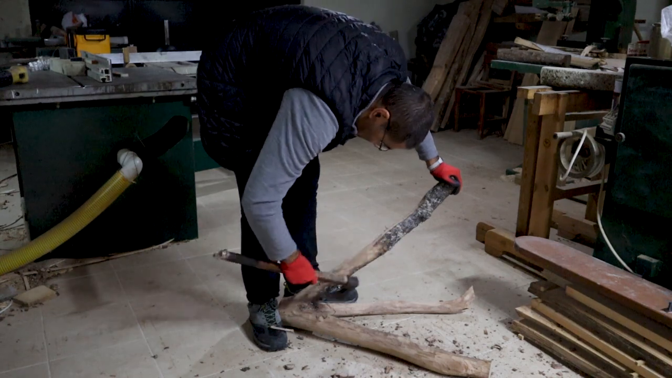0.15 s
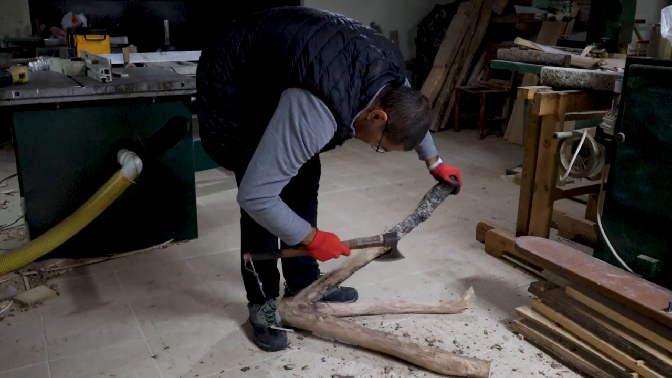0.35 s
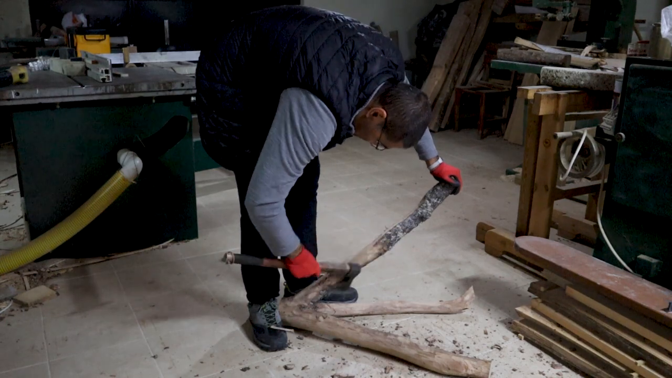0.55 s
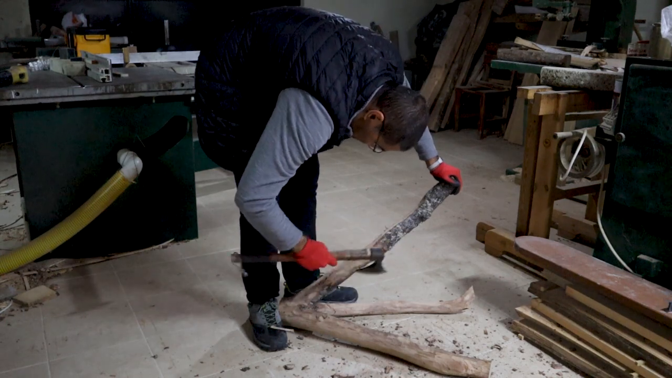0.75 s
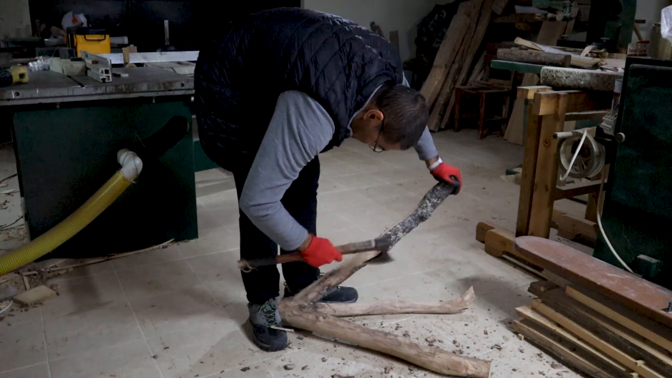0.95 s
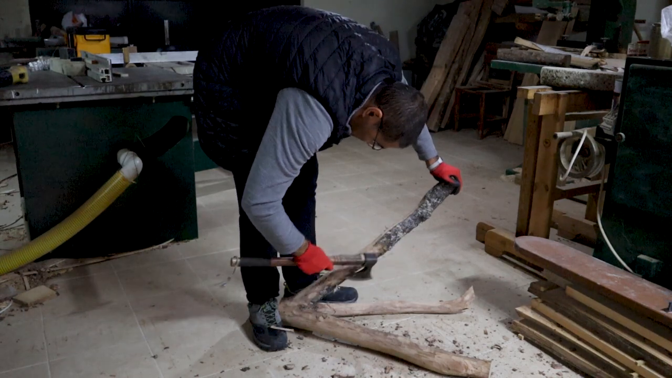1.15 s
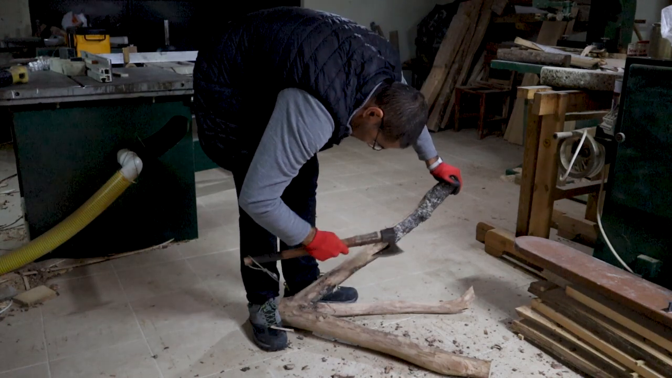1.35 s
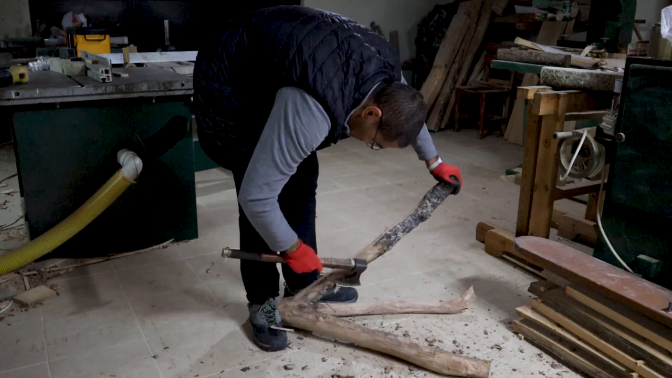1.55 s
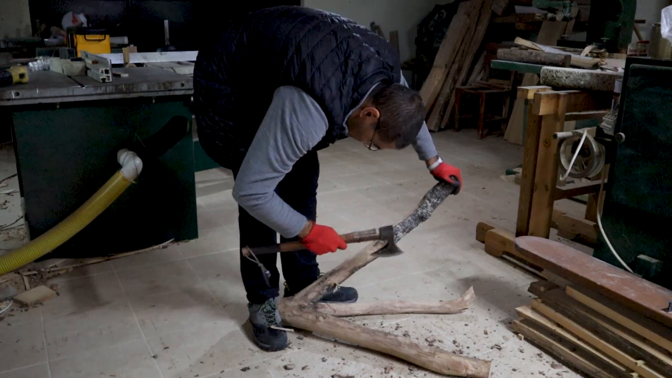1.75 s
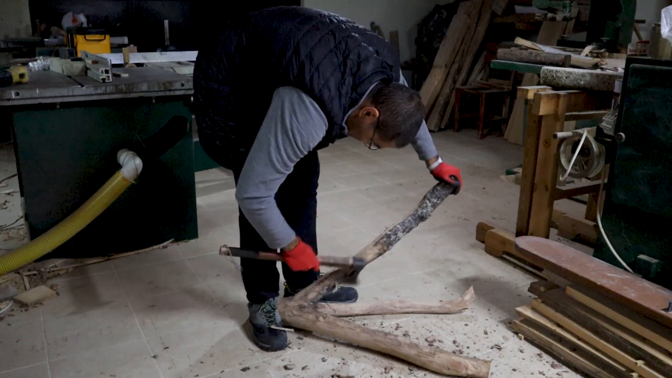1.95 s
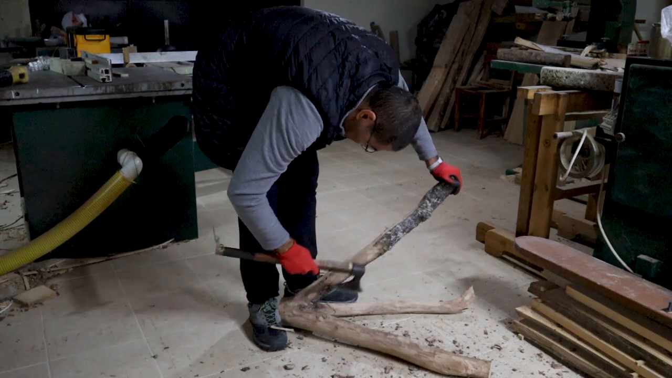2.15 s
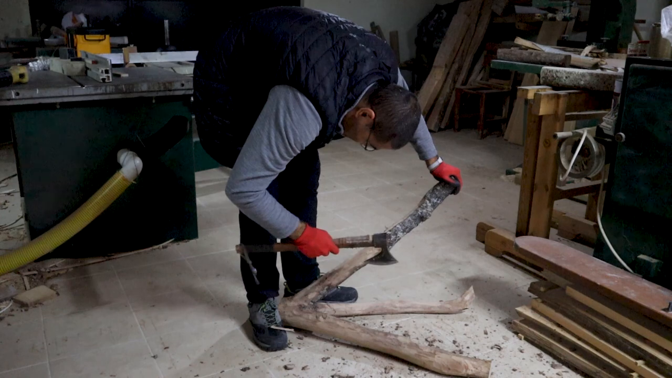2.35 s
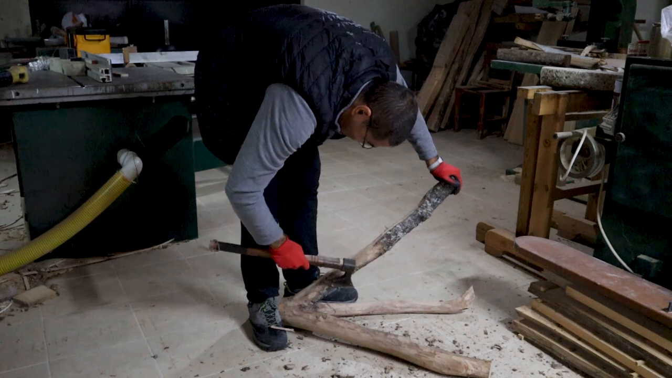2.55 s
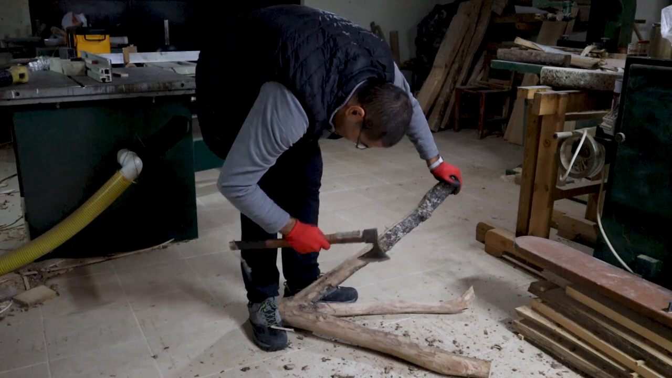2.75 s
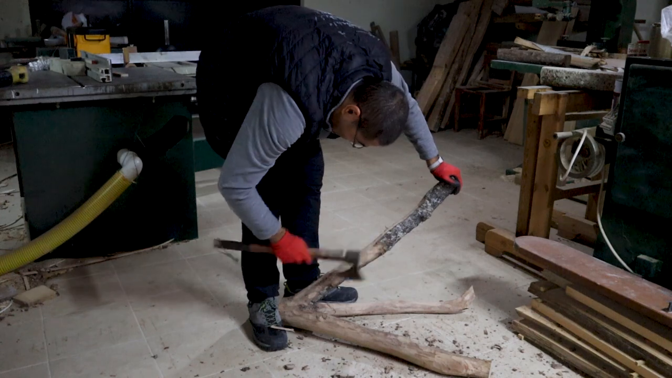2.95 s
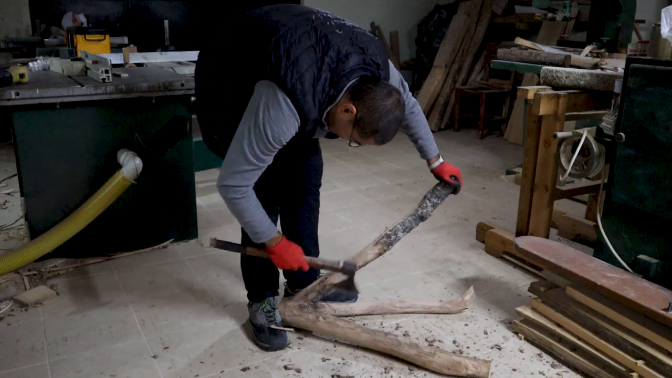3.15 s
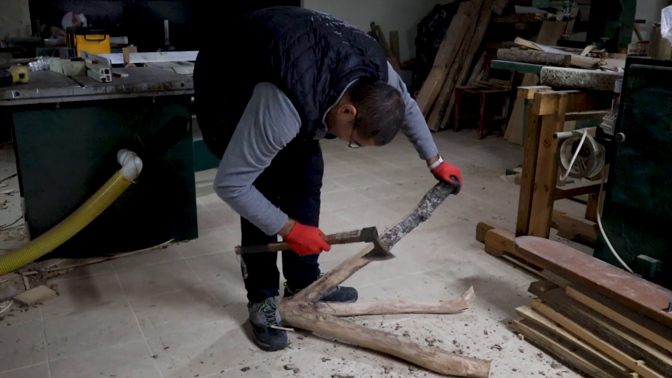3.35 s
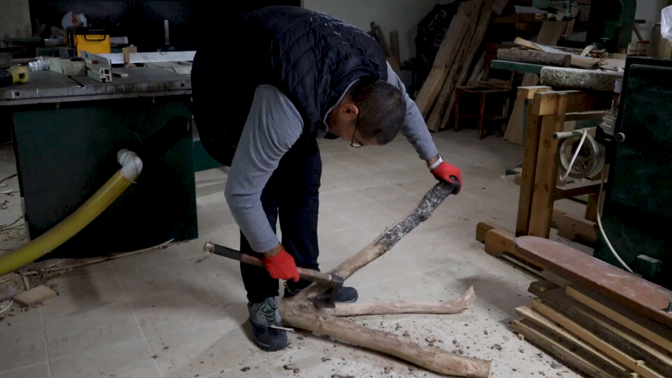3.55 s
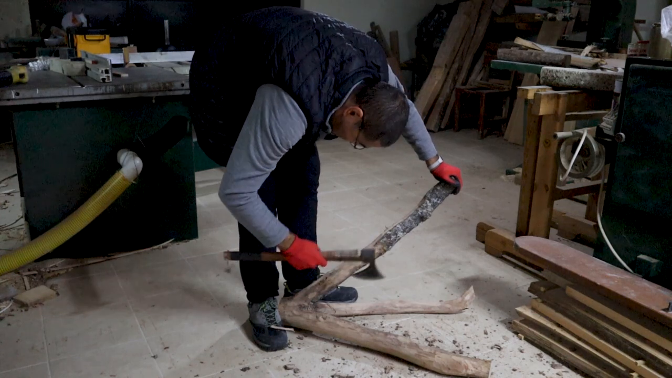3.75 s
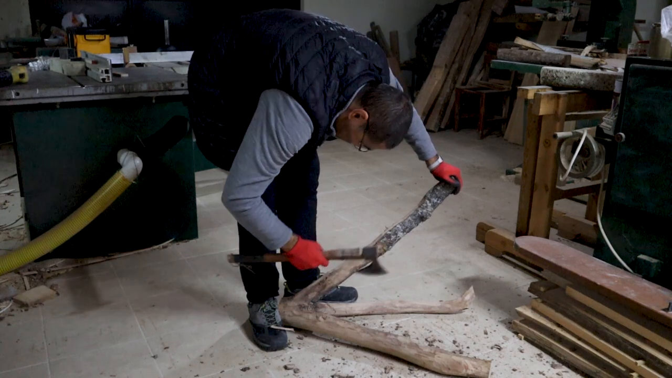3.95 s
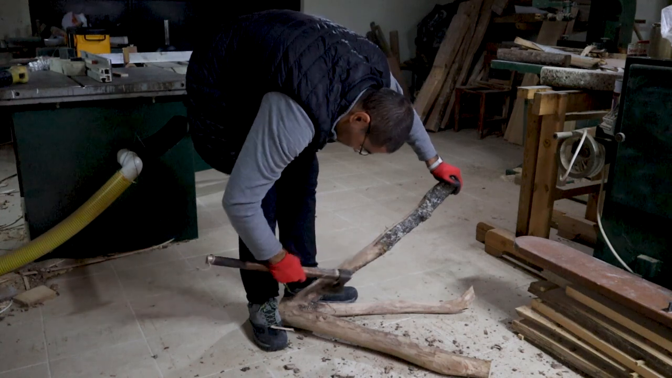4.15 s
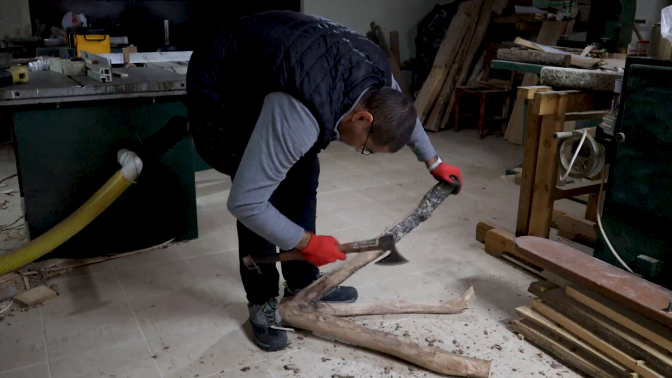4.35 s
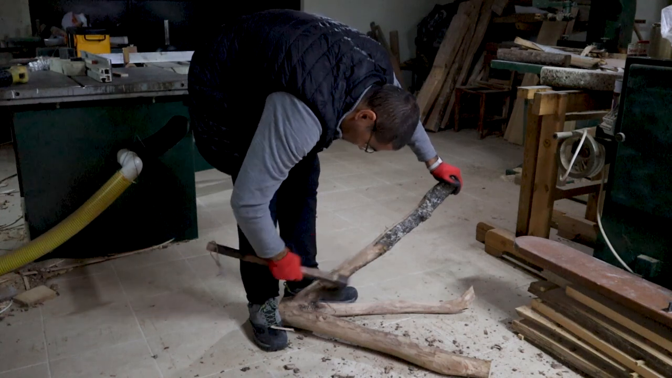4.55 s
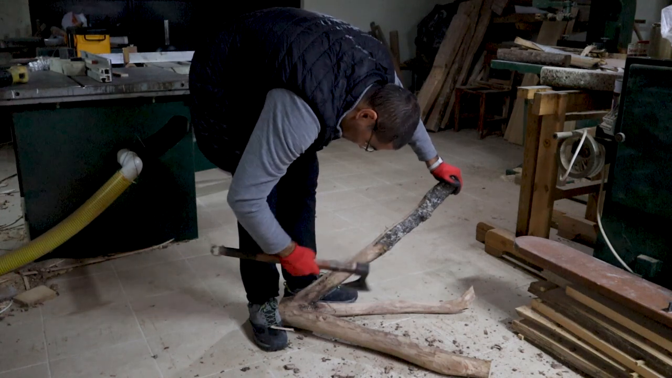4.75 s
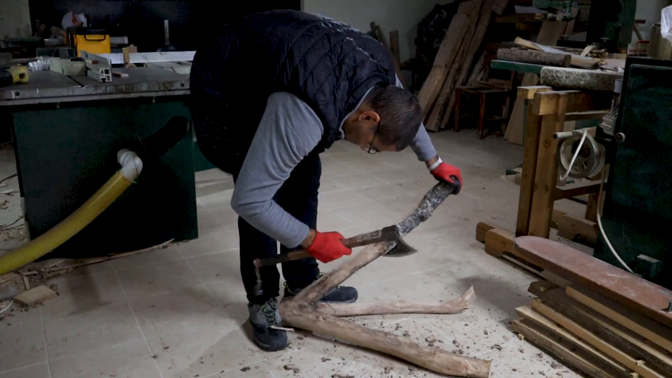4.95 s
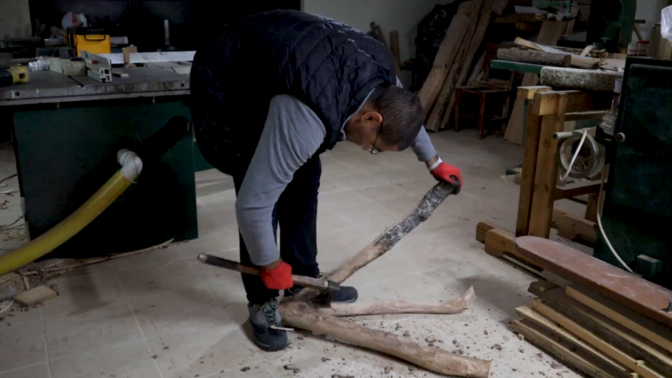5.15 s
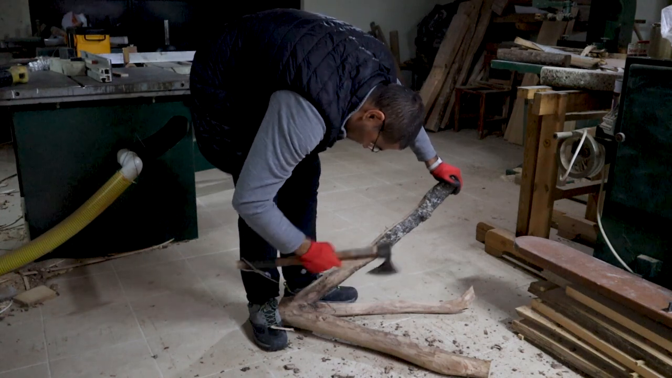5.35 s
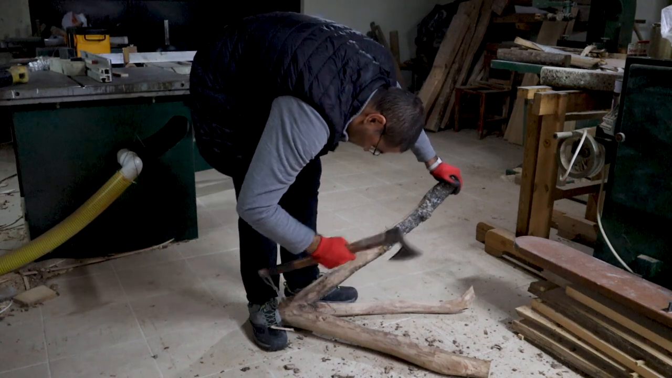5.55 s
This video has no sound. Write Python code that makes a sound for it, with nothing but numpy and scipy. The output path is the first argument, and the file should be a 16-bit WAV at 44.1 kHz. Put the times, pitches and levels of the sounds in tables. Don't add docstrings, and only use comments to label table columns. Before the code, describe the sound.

A hatchet hews a branch in a tiled workshop for about five and a half seconds. A soft bark scuff at 0.1 leads straight into a strong, woody crack at 0.14. Further blows fall evenly at about 0.66, 1.15, 1.6, 2.1, 2.6, 3.1, 3.6, 4.2, 4.7 and 5.2. Each combines a short midrange knock, a small high steel ring and a gritty rip of fibres; the later ones, especially around 4.2 and 4.7, catch again in quick double jerks. Loose boards resonate faintly, with a slight floor thud. Thin splinters and chips tick brightly between blows, clearest near 3.74, with scuffs at 2.0, 3.6 and 5.17. At 5.53 a larger chip skitters in four rapid bounces. Dense room echo fades over half a second. The small microphone has little bass, overloads on impacts, then its level ducks and recovers over a quiet murmur and hiss.

```python
import sys
import numpy as np
from scipy import signal
from scipy.fft import rfft, irfft
from scipy.io import wavfile
from scipy.ndimage import uniform_filter1d

SR = 44100
rng = np.random.default_rng(int(sys.argv[2]) if len(sys.argv) > 2 else 0)


def to_linear_factor(level_db):
    exponent = np.asarray(level_db, float) / 20
    return 10 ** exponent


def bounce(signal):
    frames = np.transpose(np.atleast_2d(signal))
    limited = np.clip(frames, -1, 1)
    pcm = np.round(limited * 32767).astype(np.int16)
    wavfile.write(sys.argv[1], SR, pcm)


N = 246519


def at_hz(points, hz):
    table_hz, values = np.array(points).T
    return np.interp(np.log(np.maximum(hz, 1)), np.log(table_hz), values)


def colour(x, spectrum):
    gain = to_linear_factor(at_hz(spectrum, np.fft.rfftfreq(len(x), 1 / SR)))
    return irfft(rfft(x) * gain / np.sqrt(np.mean(gain ** 2)), len(x))


def ring(force, hz, t60):
    r, w = to_linear_factor(-60 / (t60 * SR)), 2 * np.pi * hz / SR
    return signal.lfilter([0, np.sin(w)], [1, -2 * r * np.cos(w), r * r], force + 1e-18)


def unit_energy(x):
    return x / np.sqrt(np.sum(x ** 2) / SR)


def bandpass(x, low_hz, high_hz):
    band = [low_hz, min(high_hz, 0.45 * SR)]
    return signal.sosfilt(signal.butter(2, band, "band", fs=SR, output="sos"), x)


def highpass(x, hz):
    return signal.sosfilt(signal.butter(2, hz, "high", fs=SR, output="sos"), x)


def add(track, s, sound):
    i = round(s * SR)
    track[i:i + len(sound)] += sound[:N - i]


def grit(size, spread_db, per_s):
    heights = to_linear_factor(spread_db * np.minimum(rng.exponential(1, size), 4))
    clicks = heights * rng.choice([-1, 1], size) * (rng.random(size) < per_s / SR)
    return clicks / np.sqrt(np.mean(clicks ** 2) + 1e-12)


# (frequency [Hz], density [dB per Hz])
HUM_SPECTRUM = [(12, -45), (20, -18), (43, -13), (146, -1.5), (277, 2), (558, -6), (802, -2.5), (949, -7),
                (1400, -8.5), (2750, -16), (8180, -27.5), (14700, -36), (16000, -23)]


def hum():
    return to_linear_factor(-49.5) * colour(rng.standard_normal(N), HUM_SPECTRUM)


# (frequency [Hz], decay to -60 dB [s])
ROOM_DECAY = [(80, .45), (250, .52), (800, .6), (1500, .57), (3500, .52), (8000, .5), (15000, .38)]
# (frequency [Hz], level [dB])
ROOM_TONE = [(100, 5.5), (400, 3), (1200, -1), (4000, 1.5), (9000, -4.5), (15000, -8.5)]


def workshop(x):
    t, gap_s = np.arange(SR) / SR, 0.0015
    edges = 40 * 2 ** np.arange(0, 9.1, 0.5)
    white = rng.standard_normal((2, SR))
    echo = 0
    for k, (low, high) in enumerate(zip(edges, edges[1:])):
        centre_hz = np.sqrt(low * high)
        t60 = at_hz(ROOM_DECAY, centre_hz)
        fade = to_linear_factor(-60 * t / t60) / np.sqrt(t60 * SR / (2 * np.log(1000)))
        echo = echo + to_linear_factor(at_hz(ROOM_TONE, centre_hz)) * bandpass(white[k % 2], low, high) * fade
    echo = echo * (1 - np.exp(-(t / gap_s) ** 2))
    return signal.fftconvolve(x, echo)


def ticks(rows, octaves, lift_db):
    out, t = np.zeros(N), np.arange(SR // 20) / SR
    for s, peak_db, hz, length_s in rows:
        burst = grit(len(t), 0.64, 20000) * np.exp(-t / max(length_s, 0.0005))
        burst = bandpass(burst, hz / 2 ** octaves, hz * 2 ** octaves)
        add(out, s, to_linear_factor(peak_db + lift_db) * burst)
    return out


# (time [s], peak level [dB], centre [Hz])
SPLINTER_LANDINGS = [
    (0.7537, -43, 12800),
    (0.8094, -58, 12700),
    (3.2274, -48, 15000),
    (3.2575, -51, 13900),
    (3.7375, -38, 13800),
    (3.7908, -49, 13500),
    (5.4181, -56, 12400),
]


def splinters():
    return ticks([(*row, 0.003) for row in SPLINTER_LANDINGS], octaves=0.45, lift_db=3.1)


# (time [s], peak level [dB], centre [Hz])
CHIP_LANDINGS = [(0.9844, -49, 12100), (1.5444, -54, 8270), (1.9954, -43, 7800), (3.0315, -45, 7400),
                 (3.4401, -47, 8000), (3.543, -43, 7900), (3.9908, -42, 9000), (4.549, -46.5, 8200),
                 (5.174, -45, 11400), (5.1804, -48, 8210), (5.508, -41, 8400)]


def chips():
    return ticks([(*row, 0.003) for row in CHIP_LANDINGS], octaves=0.88, lift_db=-4.5)


# (time [s], peak level [dB])
SKITTER_BOUNCES = [
    (5.5343, -37.5),
    (5.5386, -31),
    (5.543, -35),
    (5.5484, -39),
]


def skitter():
    return ticks([(*row, 4500, 0.0015) for row in SKITTER_BOUNCES], octaves=0.85, lift_db=1.1)


# (time [s], peak level [dB], centre [Hz], length [s])
BARK_BRUSHES = [
    (0.092, -39.5, 1530, 0.006),
    (1.527, -58, 1180, 0.0055),
    (1.997, -34, 1160, 0.0024),
    (3.024, -43, 1020, 0.01),
    (3.59, -33.5, 1240, 0.0044),
    (4.485, -38, 972, 0.0058),
    (5.164, -30, 1290, 0.0021),
    (5.171, -32, 1200, 0.0039),
]


def brushes():
    return ticks(BARK_BRUSHES, octaves=0.72, lift_db=8.5)


# (time [s], jolt level [dB], snap level [dB])
EDGE_CATCHES = [(1.158, -21, 2), (1.609, -13, 10), (2.1, -12, -17), (3.640, -25, 13), (3.660, -13, -17),
                (4.182, -33, -19), (4.192, -4.5, -13), (4.199, -0.5, -21), (4.694, -3, 12.5),
                (4.708, 2.5, -12), (4.720, -1.5, -26), (5.255, -1.5, -29)]


def bite(t, s, travel_s):
    biting = np.exp(-(t / max(1.366 * travel_s, 0.002)) ** 3)
    force = to_linear_factor(-26.5) * grit(len(t), 2.2, 4000) * biting
    force[0] += 1
    snaps = np.exp(-t / 0.0025)
    for when, jolt_db, snap_db in EDGE_CATCHES:
        late = when - s
        if 0 < late < 0.1:
            force[round(late * SR)] += to_linear_factor(jolt_db)
            snaps = snaps + to_linear_factor(snap_db) * (t > late) * np.exp(-np.abs(t - late) / 0.0042)
    return force, biting, snaps


def floor_thud(force):
    return ring(signal.lfilter([0.06], [1, -0.94], force), 137, 0.044)


# (frequency [Hz], level [dB], decay to -60 dB [s])
BOARD_MODES = [(822, -26, 0.46), (1390, -27.5, 0.25), (371, -24.5, 0.14)]


def boards(contact):
    return sum(to_linear_factor(db) * ring(contact, hz, t60) for hz, db, t60 in BOARD_MODES)


# (frequency [Hz], density [dB per Hz])
TEARING_SPECTRUM = [(300, 15), (1000, 25.5), (2500, 7), (4500, -7.5), (8000, -10), (12000, -18.5),
                    (16000, -30)]


def tearing(biting, snaps):
    bright_db = 11
    tilted = [(hz, db + bright_db * np.log2(hz / 2000) / 2) for hz, db in TEARING_SPECTRUM]
    fibres = colour(grit(len(biting), 2.5, 15000), tilted)
    return fibres * (biting + 0.5 * snaps)


# (frequency [Hz], level [dB], decay to -60 dB [s])
HEAD_MODES = [(6055, -0.7, 0.13), (5825, 0.3, 0.09), (7900, 10.5, 0.011), (10990, 10, 0.1),
              (3350, 0.5, 0.022), (5480, -16.5, 0.021), (6560, -12, 0.047), (5887, -6.5, 0.13),
              (3270, -26, 0.032), (3562, -4, 0.024), (6150, -8, 0.073), (10250, -13.5, 0.043),
              (15100, -28, .03)]


def steel_head(force, ring_db, lean_db):
    cheek_db = -62
    weaker_db = rng.normal(ring_db + lean_db / 2, 3, len(HEAD_MODES) - 5)
    mix_db = [ring_db + lean_db, ring_db, ring_db - 9.5, ring_db - 13.5 - lean_db / 2, cheek_db, *weaker_db]
    longest_s = 0.14
    return sum(to_linear_factor(db + more) * unit_energy(ring(force, hz, min(t60, longest_s)))
               for (hz, db, t60), more in zip(HEAD_MODES, mix_db))


# (frequency [Hz], level [dB], decay to -60 dB [s])
BRANCH_MODES = [(201, -15, 0.06), (287, -13.5, 0.03), (393, -8.5, 0.017), (532, -4, 0.012),
                (624, 1.23, 0.02), (684.4, 1, 0.022), (829, -2.5, 0.018), (1002, -3.5, 0.024),
                (1106, 3, 0.02), (1200, -0.5, 0.021), (1275, -2.5, 0.025), (1449, 1, 0.02),
                (1605, -0.2, 0.014), (1832, -3, 0.016), (2125, -8.5, 0.012), (2340, -26, 0.054),
                (2570, -13.5, 0.0039)]


def branch(contact, middle_db, hard_db):
    pitch = np.array(BRANCH_MODES)[:, 0]
    middle_hz, middle_octaves, hard_hz = 1403, 0.39, 1700
    middle = np.exp(-(np.log2(pitch / middle_hz) / middle_octaves) ** 4)
    strengths_db = middle_db * middle + hard_db * (pitch > hard_hz) + rng.normal(0, 1.55, len(pitch))
    longest_s, knock = 0.028, 0
    for k, ((hz, db, t60), more) in enumerate(zip(BRANCH_MODES, strengths_db)):
        knock = knock + (-1) ** k * to_linear_factor(db + more) * ring(contact, hz, min(t60, longest_s))
    return knock


# (time [s], knock level [dB], travel of the edge [s], tearing level [dB], floor thud level [dB])
HATCHET_BLOWS = [(0.136, 2.5, 0.0045, -21, -17), (0.659, -6, 0.012, -20.5, -25),
                 (1.146, -2.5, 0.009, -19, -36), (1.6, -9, 0.005, -27.5, -11),
                 (2.088, -10.5, 0.02, -24.5, -12.5), (2.619, -6.5, 0.0084, -25.5, -41),
                 (3.112, -4, 0.016, -18.5, -12), (3.636, -7.5, 0.011, -21.5, -9.5),
                 (4.177, -7.5, 0.024, -22.5, -10.5), (4.691, -1.5, 0.024, -26, -19),
                 (5.232, -7.5, 0.019, -18.5, -46)]
# (middle branch modes [dB], hardness of the spot [dB], head ring [dB],
# lean to the head's first mode [dB])
BLOW_LANDINGS = [(-2.5, -4, -54, 4), (-18, 6, -52.5, -10), (4.5, 1, -52, 4.5), (4.5, 0.5, -64, 4),
                 (7, -1.5, -58, 14), (-7, -13, -63.5, 10), (-3, -19, -53, 1.5), (0, -18, -52.5, -0.5),
                 (-6.5, -6, -52, -4), (-1, -3.5, -54.5, -5), (1.5, 0, -52, 4)]


def blows():
    out, t = np.zeros(N), np.arange(SR // 2) / SR
    for blow, landing in zip(HATCHET_BLOWS, BLOW_LANDINGS):
        s, knock_db, travel_s, tear_db, thud_db = blow
        middle_db, hard_db, ring_db, lean_db = landing
        force, biting, snaps = bite(t, s, travel_s)
        contact = signal.lfilter([0.3], [1, -0.7], force)
        wood = branch(contact, middle_db, hard_db) + boards(contact)
        sound = to_linear_factor(knock_db - 5.5) * wood
        sound = sound + steel_head(force, ring_db, lean_db)
        sound = sound + to_linear_factor(tear_db - 0.3) * tearing(biting, snaps)
        sound = sound + to_linear_factor(thud_db - 21) * floor_thud(force)
        add(out, s - 0.0005, sound)
    return out


def scene():
    near = blows() + brushes() + chips() + splinters() + skitter()
    near = highpass(near, 155)
    out = near.copy()
    starts = [0, *[row[0] - 0.02 for row in HATCHET_BLOWS[1:]], N / SR]
    for start, end in zip(starts, starts[1:]):
        add(out, start, to_linear_factor(-2.5) * workshop(near[round(start * SR):round(end * SR)]))
    return out[None]


# (threshold [dB], attack [s], release [dB per s], share of the excess taken off)
SLOW_LEVELLER = (-22.5, 0.011, 190, .95)
FAST_LIMITER = (-14, 0.04, 770, .97)


def limiting(x, threshold_db, attack_s, release_db_s, share, size):
    power = uniform_filter1d(x ** 2, size=size, origin=size // 2 - 1)
    level_db = 10 * np.log10(power + 1e-12)
    ramp = release_db_s * np.arange(N) / SR
    held_db = np.maximum.accumulate(level_db + ramp) - ramp
    r = np.exp(-1 / (attack_s * SR))
    excess_db = signal.lfilter([1 - r], [1, -r], np.maximum(held_db - threshold_db, 0))
    return to_linear_factor(-share * excess_db)


def top_cut(x):
    return signal.sosfilt(signal.butter(12, 16970, fs=SR, output="sos"), x)


def record(dry):
    gain = limiting(dry[0], *SLOW_LEVELLER, size=660)
    gain = gain * limiting(gain * dry[0], *FAST_LIMITER, size=44)
    overload, cutoff_hz = 0.49, 16250
    x = highpass(gain * dry, 95) / overload
    x = overload * x / (1 + x ** 6) ** (1 / 6)
    x = x + gain * hum()
    mix = signal.sosfilt(signal.cheby2(14, 60, cutoff_hz, fs=SR, output="sos"), x)
    return top_cut(mix)


dry = scene()
out = record(dry)
bounce(out)
```